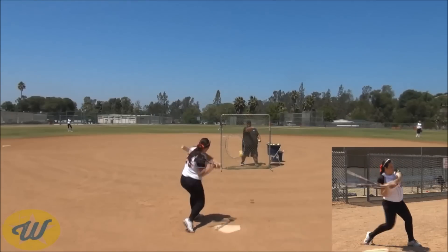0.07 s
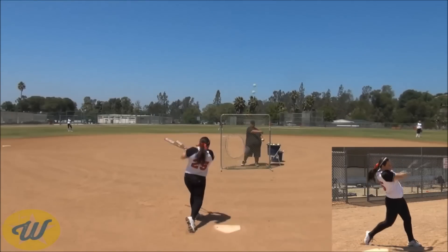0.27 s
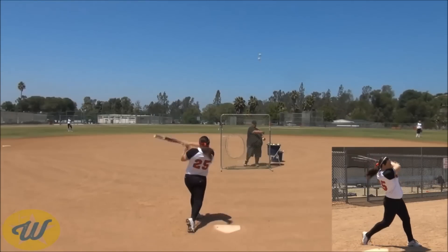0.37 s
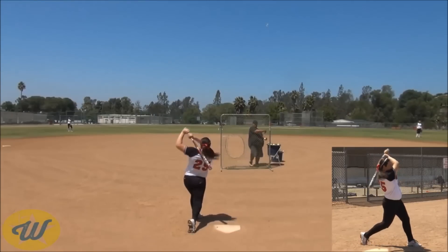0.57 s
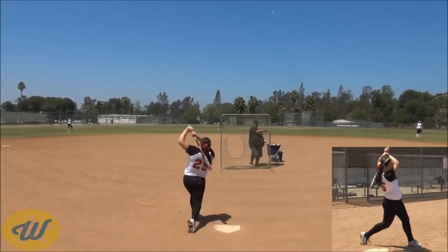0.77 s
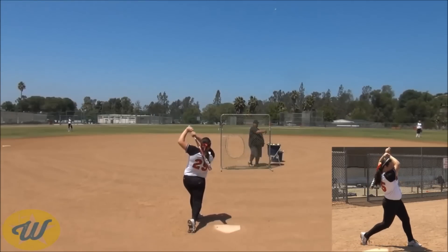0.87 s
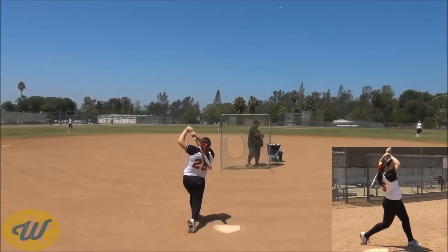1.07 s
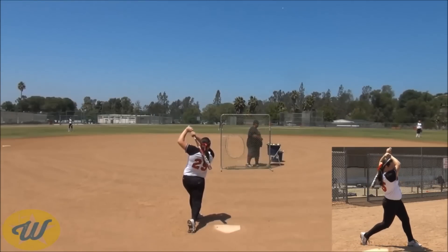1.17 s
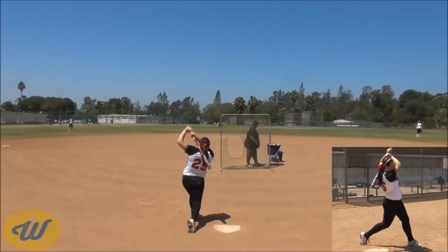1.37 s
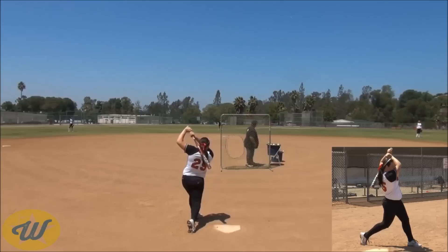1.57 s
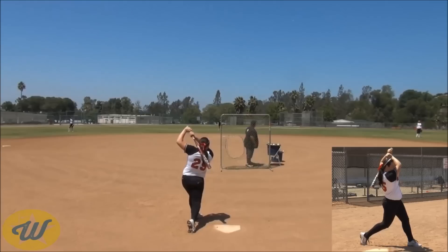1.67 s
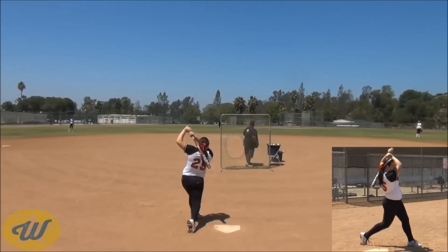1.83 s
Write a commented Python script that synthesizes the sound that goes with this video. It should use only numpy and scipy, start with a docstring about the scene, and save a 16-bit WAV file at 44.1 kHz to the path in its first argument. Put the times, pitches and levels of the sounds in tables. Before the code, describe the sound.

A bat hits a softball with one loud, sharp crack at about 0.2 seconds, close by, just after faint shoe scuffs on dirt and a soft puff from the swing. The crack echoes across the open field and fades by about 0.7 seconds. A very faint distant bird then sings over a low outdoor rumble, with soft scuffs near 1.5 and 1.9 seconds.

```python
"""Softball hit on a dirt infield

A batter hits a pitched softball a few metres from a stereo pair of microphones. The barrel's crack
overloads them and ducks the background; the ground, fences and trees throw it back. Shoes scuff
the dirt, the swing pushes air, and far off a bird sings over a faint hum and a low outdoor rumble."""
import sys
import numpy as np
from scipy import signal
from scipy.fft import rfft, irfft
from scipy.io import wavfile
from scipy.ndimage import uniform_filter1d

SR = 44100
rng = np.random.default_rng(int(sys.argv[2]) if len(sys.argv) > 2 else 0)


def log_audio(samples):
    """Write samples as a 16-bit WAV file to the path given in sys.argv[1]."""
    # one column per channel
    frames = np.atleast_2d(samples).T
    # limit to full scale, then quantise
    limited = np.clip(frames, -1, 1)
    pcm = np.round(limited * 32767).astype(np.int16)
    wavfile.write(sys.argv[1], SR, pcm)


N = 83790
T = np.arange(N) / SR
HIT_S = 0.23705
# How sound from the field leans between the microphones: frequency_hz, left_minus_right_db
FIELD_BALANCE = [(60, 15.5), (200, 15), (380, 7), (1300, 6), (4400, 5.5), (8000, -1), (15000, 2)]


def amp(db):
    """Decibels to gain."""
    return 10 ** (np.asarray(db) / 20)


def unit(x):
    """Scales to rms 1."""
    return x / np.sqrt(np.mean(x ** 2) + 1e-20)


def curve_at(points, hz):
    """Interpolates a table on a log-frequency axis."""
    frequency, value = np.transpose(points)
    return np.interp(np.log(hz + 1), np.log(frequency + 1), value)


def pan(db):
    """Left and right gains for a level difference; positive leans left."""
    return amp(np.array([[db / 2], [-db / 2]]))


def burst(start, rise, t60):
    """Envelope: a quick rise and an exponential decay."""
    age = np.maximum(T - start, 0)
    return np.minimum(age / rise, 1) * amp(-60 * age / t60)


def swell(middle, half_length, db):
    """Bell-shaped envelope."""
    return amp(db) * np.exp(-0.5 * ((T - middle) / half_length) ** 2)


def band_noise(shape, centre_hz, width_hz):
    """Noise in one bell-shaped band, at rms 1."""
    band = np.exp(-((np.fft.rfftfreq(N, 1 / SR) - centre_hz) / width_hz) ** 2)
    return unit(irfft(rfft(rng.standard_normal(shape)) * band, N))


def noise(colour, balance=FIELD_BALANCE, t60=None, patchy_db=0):
    """Coloured stereo noise that starts at rms 1 and may die away band by band."""
    # Likeness of the two microphones' signals: frequency_hz, correlation
    likeness = [(60, 0.16), (130, -0.52), (290, -0.64), (640, -0.68), (1400, 0.48), (3100, -0.13),
                (15000, -0.029)]
    size = 2048 if t60 is None else 512
    hop = size // 4
    hz = np.fft.rfftfreq(size, 1 / SR)
    frames = N // hop + 6

    def to_sound(spectra):
        return signal.istft(spectra.swapaxes(1, 2), nperseg=size, noverlap=size - hop)[1][:, :N]

    a, b, c, d, patches = rng.standard_normal((5, frames, len(hz)))
    correlation = curve_at(likeness, hz)
    left = a + 1j * b
    right = correlation * left + np.sqrt(1 - correlation ** 2) * (c + 1j * d)
    patches = unit(uniform_filter1d(uniform_filter1d(patches, size=6, axis=0), size=8, axis=1))
    spectra = np.array([left, right]) * amp(curve_at(colour, hz) + patchy_db * patches)
    spectra *= pan(curve_at(balance, hz))
    steady = to_sound(spectra)
    if t60 is None:
        return unit(steady)
    frame_s = np.arange(frames)[:, None] * hop / SR
    return to_sound(spectra * amp(-60 * frame_s / curve_at(t60, hz))) / steady.std()


def bat_crack():
    """The ball snaps against the barrel and rings its damped modes; the ground repeats the crack."""
    # Ring of bat and ball: pitch_hz, left_db, right_db, t60_s
    modes = [(559, -7, -16, .026), (713.5, 3, -6, 0.021), (856, 5.5, -0.6, 0.013), (1171, 16, 6, .0045),
             (1485, -8, -16, 0.038), (2278, 6.5, 0.5, 0.0091), (2725, 9, -3, 0.0076),
             (3386, -13.5, -30, .045), (3677, -1.5, -18.5, 0.00875), (5370, -17.5, -31.5, .02),
             (8090, -24, 15, .0015), (9320, 7.5, 4.3, .0032), (12279, -23, 6, 0.001)]
    # Snap of the ball's cover: frequency_hz, level_db
    snap_colour = [(100, -17), (500, -1), (1500, -16), (3500, 14), (6000, -4), (11000, 8.5),
                   (16000, -14)]
    # Scatter off the batter and the nearby ground: frequency_hz, level_db
    scatter_colour = [(100, -40.5), (350, -37.5), (650, 9), (3200, 7), (5000, -8.5), (16000, -33)]
    contact_s, right_late_s, bounce_s = 0.00025, 0.00024, 0.0085
    ring = np.zeros((2, N))
    # The right microphone hears the ring later and in opposite polarity.
    for side, (start, polarity) in enumerate([(HIT_S, -1), (HIT_S + right_late_s, 1)]):
        for hz, *side_db, t60 in modes:
            envelope = amp(side_db[side]) * burst(start, contact_s, t60)
            ring[side] += polarity * envelope * np.sin(2 * np.pi * hz * (T - start))
    direct = ring + amp(-13.5) * noise(snap_colour) * burst(HIT_S, contact_s, t60=0.026)
    bounce = amp(-21.5) * np.roll(direct, round(bounce_s * SR), axis=1)
    scatter = amp(-15) * noise(scatter_colour, balance=[(100, 7), (15000, 2)])
    return direct + bounce + scatter * burst(HIT_S, rise=0.00399, t60=0.05)


def field_echoes():
    """The crack comes back as a diffuse tail, as blurred returns and as dull slaps a few cycles long."""
    # Colour of the tail and the returns: frequency_hz, level_db
    colour = [(100, -47), (350, -3), (700, 2), (1050, 2), (1600, -5.5), (2800, -4), (4600, -14.5),
              (8000, -16), (12000, -20.5), (16000, -28)]
    # Decay of the tail: frequency_hz, t60_s
    decay = [(300, 0.76), (1000, 0.65), (3000, 0.84), (8000, 0.68), (15000, 0.55)]
    # Blurred returns from the trees: middle_s, half_length_s, level_db
    tree_returns = [(.264, 0.0022, -29), (.277, 0.0023, -20.5), (0.456, .006, -35.5)]
    # Slaps off fences and dugouts: start_s, level_db, pitch_hz, rise_s
    slaps = [(0.344, -24, 2270, 0.00048), (0.3545, -22.5, 1000, 0.0018), (0.3867, -27.5, 2150, 0.00047),
             (.4215, -29, 2060, 0.00044), (0.5177, -39, 990, 0.0012), (.573, -39.5, 1860, .0006),
             (0.6228, -35.5, 1630, 0.00057)]
    tail = np.roll(noise(colour, t60=decay), round(HIT_S * SR), axis=1)
    tail *= np.clip((T - HIT_S) / 0.012, 0, 1)  # builds over 12 ms
    echoes = amp(-22) * tail + noise(colour) * sum(swell(*row) for row in tree_returns)
    for start, db, hz, rise in slaps:
        age = np.maximum(T - start, 0) / rise
        envelope = amp(db) * (age * np.exp(1 - age)) ** 2
        echoes += pan(db=14) * envelope * np.sin(2 * np.pi * hz * (T - start))
    return echoes


def shoe_scuffs():
    """Shoes grind over gritty dirt, with one short, bright scrape as the batter pivots."""
    # Soles sliding on dirt or cracking a grain of it: middle_s, half_length_s, level_db
    slides = [(0.031, 0.059, -47), (0.176, 0.067, -46), (1.456, 0.064, -48.5), (1.437, .0006, -45),
              (1.487, .0006, -48), (1.9, 0.029, -50.5)]
    # Colour of the dirt underfoot: frequency_hz, level_db
    dirt_colour = [(100, -2), (450, 2), (1600, -2), (4000, -7.5), (7000, -28.5), (15000, -33)]
    grains_per_s, spread_db, grit_share = 1000, 3.5, 0.48
    grains = rng.random(N) < grains_per_s / SR
    grain_gain = amp(spread_db * np.minimum(rng.exponential(1, N), 4))
    grit = unit(np.sqrt(abs(uniform_filter1d((grains * grain_gain) ** 2, size=40))))
    scrape = band_noise((2, N), centre_hz=5660, width_hz=1100) * swell(0.157, 0.014, db=-56)
    scuffs = noise(dirt_colour) * sum(swell(*row) for row in slides)
    return (scuffs + scrape) * unit(1 - grit_share + grit_share * grit)


def swing_gust():
    """The swing sends a low puff of air to the microphones, mostly the left one."""
    # Colour of the puff: frequency_hz, level_db
    colour = [(20, -36), (80, 7.5), (300, -23), (8000, -56)]
    return noise(colour, balance=[(20, 21.5), (8000, 21.5)]) * swell(0.231, 0.019, db=-32.5)


def bird():
    """Whistled notes that glide, settle and flutter in level, blurred by the distant trees."""
    # The song: start_s, length_s, first_hz, last_hz, level_db
    notes = [(.684, 0.043, 3023, 3050, -61), (.733, .018, 2560, 2500, -63.5),
             (.752, 0.0556, 3080, 3230, -56.5), (.81, 0.062, 3227, 3210, -62.5),
             (.885, 0.029, 3260, 3220, -65.5), (.94, 0.049, 2960, 2520, -65.5),
             (1.195, .04, 2780, 2520, -73), (1.237, 0.064, 2950, 3780, -63),
             (1.283, 0.023, 3450, 3120, -61.5), (1.315, .05, 3150, 3610, -62.5),
             (1.368, .07, 3280, 3067, -65), (1.53, 0.046, 3040, 3127, -64), (1.653, 0.059, 4120, 3940, -67),
             (1.735, .14, 3900, 2950, -70.5)]
    waver_depth, octave_db, flutter_db = 0.01095, -20.5, 2.3
    song = np.zeros(N)
    waver = 1 + waver_depth * unit(uniform_filter1d(rng.standard_normal(N), size=150))
    for start, length, first_hz, last_hz, db in notes:
        progress = np.clip((T - start) / length, 0, 1)
        hz = last_hz + (first_hz - last_hz) * (1 - progress) ** 2
        phase = 2 * np.pi * np.cumsum(hz * waver) / SR
        envelope = amp(db) * np.sqrt(8 * progress * (1 - progress))
        song += envelope * (np.sin(phase) + amp(octave_db) * np.sin(2 * phase))
    song *= amp(flutter_db * unit(uniform_filter1d(rng.standard_normal(N), size=400)))
    trees = rng.standard_normal((2, N)) * burst(0, rise=0.01, t60=0.44)
    reverb = signal.fftconvolve(song[None], trees / np.linalg.norm(trees[0]), axes=1)[:, :N]
    return pan(db=8) * (song + amp(-1) * reverb)


def far_hum():
    """A faint, wavering hum swells and fades far away."""
    pitch_hz = 264
    hum = band_noise(N, pitch_hz, width_hz=9) * swell(0.78, 0.24, db=-57.5)
    return pan(curve_at(FIELD_BALANCE, pitch_hz)) * hum


def outdoor_rumble():
    """The steady, low background of the open field."""
    # Colour of the background: frequency_hz, level_db
    colour = [(20, -12), (85, 1), (270, -10), (370, -13.5), (1200, -22), (2000, -31), (3200, -27.5),
              (5000, -37.5), (15000, -46.5)]
    return amp(-42) * noise(colour, patchy_db=0.5)


def scene():
    """Everything that reaches the microphones, from the bat to the far background."""
    hit = bat_crack() + field_echoes()
    return hit + shoe_scuffs() + swing_gust() + bird() + far_hum() + outdoor_rumble()


def record(dry):
    """The input clips and its baseline sags; gain control ducks and recovers; the top treble is cut."""
    ceiling, sag_gain, sag_s, sag_hz = 0.89, 0.078, 0.077, 2.67
    threshold_db, duck_share, attack_s, release_db_per_s = -31, 0.68, 0.021, 86.5

    def smooth(x, seconds):
        pole = np.exp(-1 / (seconds * SR))
        return signal.lfilter([1 - pole], [1, -pole], x)

    clipped = np.clip(dry, -ceiling, ceiling)
    overload = abs(dry - clipped).sum(0)
    sag_shape = np.exp(-T / sag_s) * np.cos(2 * np.pi * sag_hz * T)
    sag = signal.fftconvolve(overload / (overload.sum() + 1e-9), sag_shape)[:N]
    level_db = 10 * np.log10(smooth((clipped ** 2).mean(0), seconds=0.0025) + 1e-12)
    # The level detector holds each peak and lets it fall at a steady rate.
    held_db = np.maximum.accumulate(level_db + release_db_per_s * T) - release_db_per_s * T
    duck_db = smooth(duck_share * np.maximum(held_db - threshold_db, 0), attack_s)
    ducked = clipped * amp(-duck_db) - sag_gain * sag
    lowpass = signal.firwin(255, cutoff=16100, window=("kaiser", 9), fs=SR)
    return signal.oaconvolve(ducked, lowpass[None], "same")


dry = scene()
out = record(dry)
log_audio(out)
```